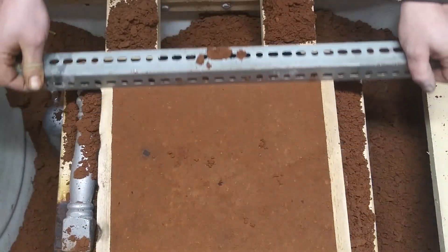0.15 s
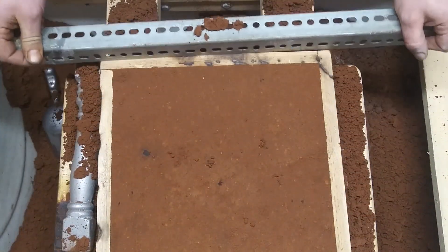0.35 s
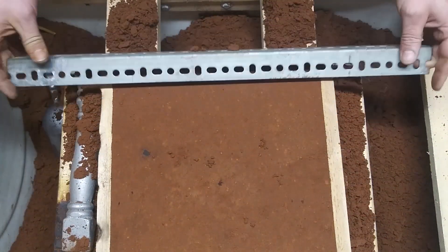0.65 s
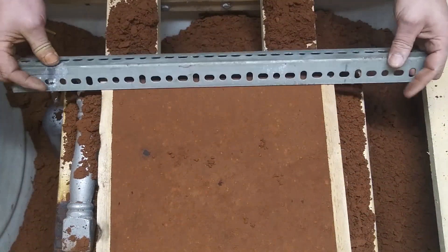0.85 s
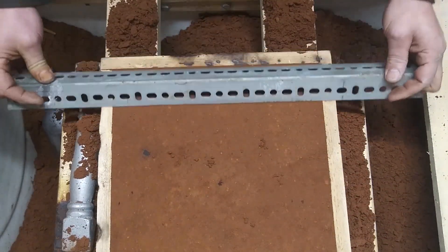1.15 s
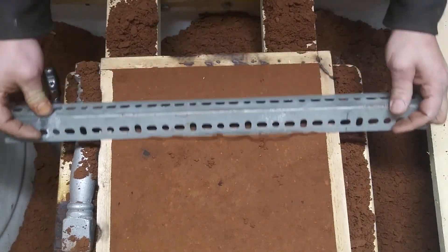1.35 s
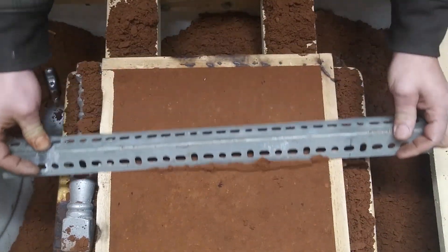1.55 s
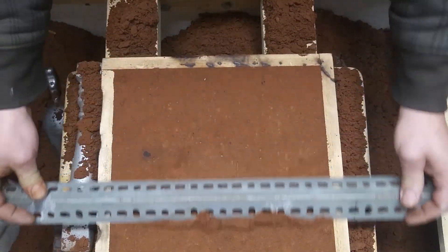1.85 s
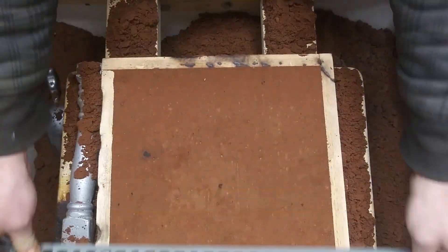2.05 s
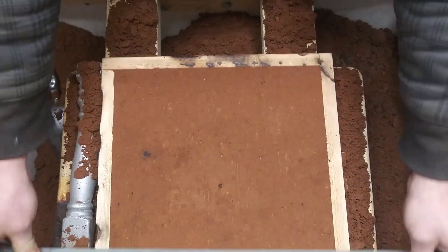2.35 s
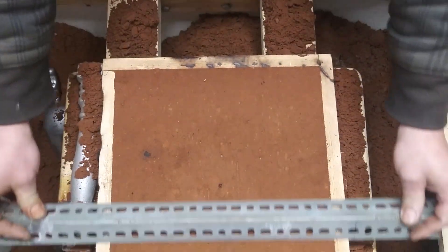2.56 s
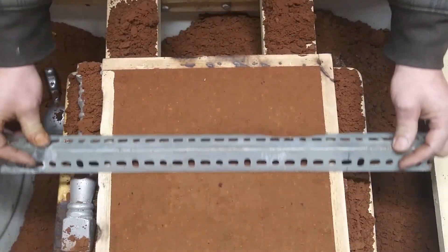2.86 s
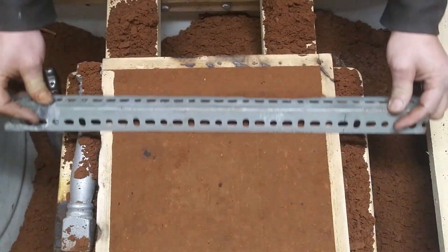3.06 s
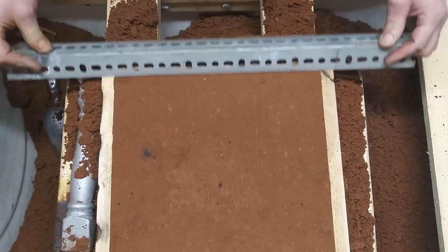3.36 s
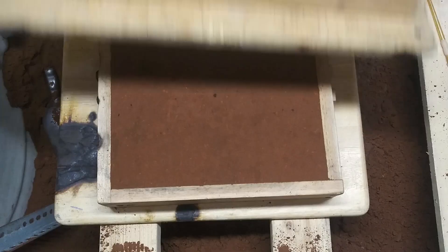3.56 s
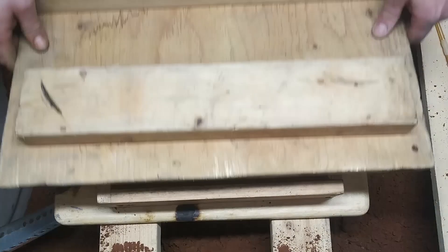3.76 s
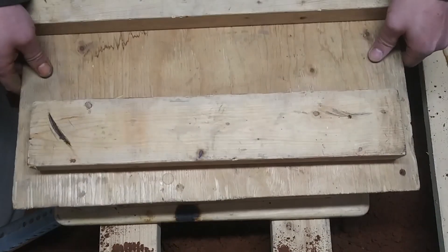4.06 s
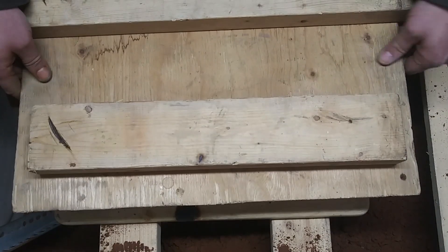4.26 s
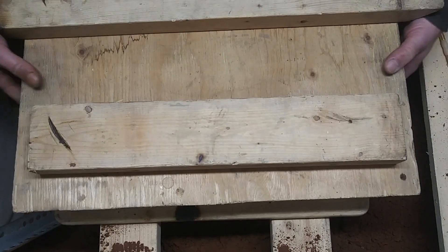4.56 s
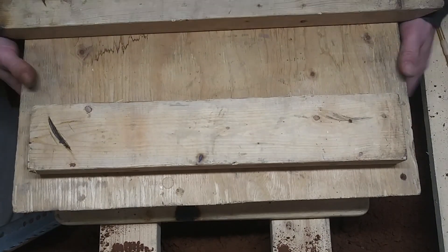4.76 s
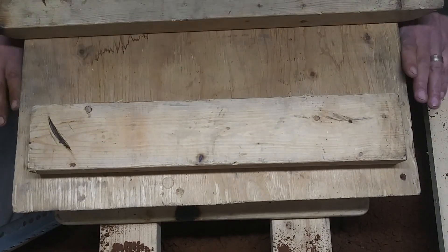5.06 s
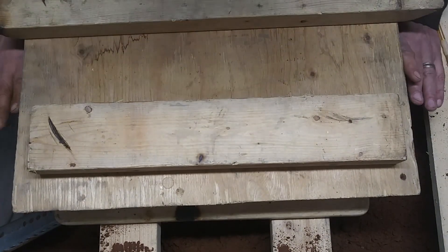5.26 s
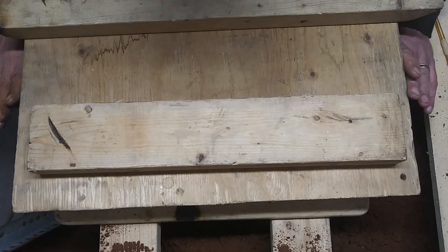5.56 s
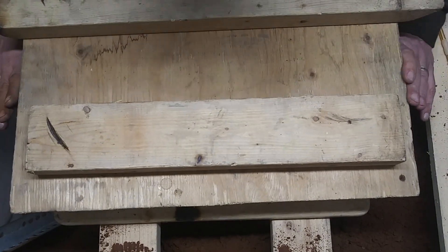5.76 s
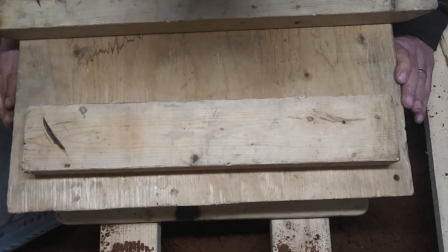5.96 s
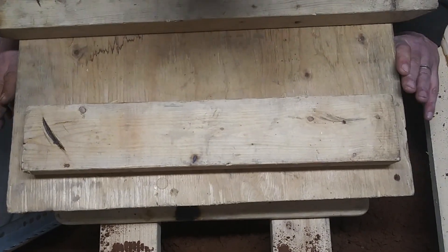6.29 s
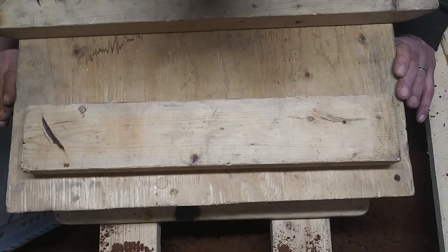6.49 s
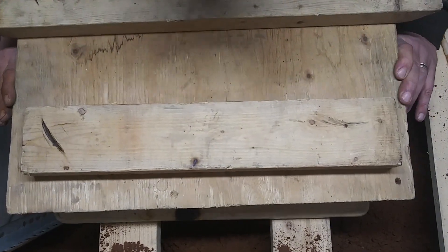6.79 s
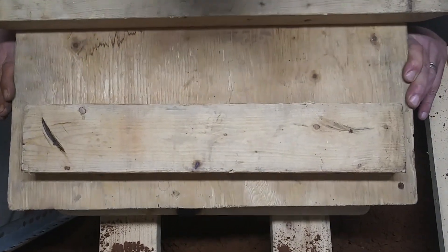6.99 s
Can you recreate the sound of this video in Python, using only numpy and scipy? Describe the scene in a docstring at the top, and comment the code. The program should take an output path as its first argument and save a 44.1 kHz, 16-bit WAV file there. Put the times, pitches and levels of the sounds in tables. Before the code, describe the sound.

A steel bar scrapes hissing across damp sand in three strokes, knocking a wooden frame, then a plywood board drops with a clattering thud and is nudged.

```python
"""A steel bar hisses, sings and grinds over damp sand in three strokes and knocks on a wooden frame;
then a plywood board drops with a rattle and is rubbed and nudged into its bed, in a small quiet workshop.
The perforated angle bar shaves the sand level: random grain clicks drive its modes and shake the frame.
Blows are decaying modes and noise bursts; pushes of the board are swells of grain noise.
Diffuse wall echoes and a steady air noise lie behind."""
import sys
import numpy as np
from scipy import signal
from scipy.fft import rfft
from scipy.io import wavfile

SR = 44100
rng = np.random.default_rng(int(sys.argv[2]) if len(sys.argv) > 2 else 0)


def inscribe(sig):
    """Save sig as 16-bit PCM at rate SR to the path in sys.argv[1].

    A 1-D sig is mono; a 2-D sig holds one channel per row.
    Samples are clipped to [-1, 1] before scaling.
    """
    pcm = np.round(np.clip(np.atleast_2d(sig).T, -1, 1) * 32767)
    wavfile.write(sys.argv[1], SR, pcm.astype(np.int16))


N = 314433
TIME = np.arange(N) / SR
RING_TIME = TIME[:SR // 2]
HEAP_FLANGE_DB = -14.5  # muffling by a full heap of sand

# steel bar modes: f/Hz, relative level scraped/dB, relative level struck/dB, t60 struck/s
BAR_MODES = [(1190, -28, -13, 0.14), (1620, -21, -12, 0.16), (2444, -12.5, -6, 0.096),
             (3585, 2, -11.5, 0.1), (4070, -7, -31, 0.015), (4750, -0.5, -13, 0.064),
             (5674, -2.5, -8.5, 0.044), (6240, -5, -15, 0.065), (7180, -27, -10.5, .11),
             (7530, -30, -14, 0.12), (8010, -4, -31, 0.078), (8380, -22, -24, .12), (9300, -18, -24, 0.12),
             (9010, 1.5, -26, 0.083), (9600, 1, -14, 0.17), (10150, -2, -21, .12)]
# sand-filled frame modes: f/Hz, relative level/dB, t60/s
FRAME_MODES = [(122.2, -12.5, 0.23), (205, -2, 0.083), (247, -5, 0.076), (310, 0.5, 0.038),
               (380, -7.5, 0.031), (583, -15, 0.09), (728, -23, 0.062), (1345, -27, 0.04)]
# plywood board modes: f/Hz, relative level/dB, t60 off the sand/s
BOARD_MODES = [(111.3, -15.5, 0.73), (138.5, -13, .25), (210.6, -2, 0.13), (288.7, -8, 0.042),
               (384, 1.5, 0.083), (456.4, -10, 0.21), (498, -13, 0.15), (613, -3.5, .1), (652, -17.5, .11),
               (708, -11.5, 0.17), (816, 2.5, 0.078), (885, -7.5, .08), (992, -10, 0.067),
               (1076, -16, 0.075), (1950, -18.5, .09), (3070, -11, .08)]
# spectrum of sand hiss under the bar: f/Hz, relative level per Hz/dB
BAR_HISS_SPECTRUM = [(2000, -17), (3200, -16.5), (5600, -15), (6600, -5), (7300, -4.5), (8000, 3.5),
                     (8600, 3), (9400, -1), (10300, -4), (11900, -8), (14000, -7.5), (15800, -23)]
# spectrum of the rumble of rubbing: f/Hz, relative level per Hz/dB
RUMBLE_SPECTRUM = [(30, -33), (70, -23.5), (105, -6), (155, -9), (225, 5.5), (290, -4), (400, -12.5),
                   (600, -25.5), (1500, -62)]
# spectrum of dense wood modes: f/Hz, relative level per Hz/dB
WOOD_SPECTRUM = [(40, -29), (80, -10), (130, -6.5), (250, -4), (450, 1.5), (900, 1.5), (1250, -5.5),
                 (1600, -9), (2000, -14), (3000, -23), (5000, -38), (12000, -48.5)]
# spectrum of crushed grit: f/Hz, relative level per Hz/dB
GRIT_SPECTRUM = [(200, 2), (1000, 1), (2700, -3.5), (4200, -5), (6500, -15), (8400, 2), (10500, -9.5),
                 (15500, -23.5)]


def bar_scrape():
    """Grains hiss under the edge, ring the steel and shake the frame."""
    # bar brushing the sand in passing: t/s, half length/s, hiss level/dB, edge rasp level/dB
    brushes = [(0.45, .05, -62.5, -83), (0.53, .015, -57, -84), (0.635, 0.031, -43, -75),
               (0.818, .02, -45, -59), (0.94, 0.09, -68, -71), (2.244, 0.014, -37, -43.5)]
    # bare edge rasp spectrum: f/Hz, relative level per Hz/dB
    edge_spectrum = [(300, -6), (2000, -13), (2550, 6), (3200, -4), (4400, 3), (5500, -12), (9000, -16)]
    # frame rasp spectrum: f/Hz, relative level per Hz/dB
    rasp_spectrum = [(280, 1), (480, 0.5), (720, 0.5), (950, -1), (1350, 1.5), (1900, -6), (2700, -26),
                     (5000, -2), (9000, -31)]
    flange_hz = 2445  # strong low resonance of the bar, damped by the sand
    hiss_gain, steel_gain, flange_gain, rasp_gain, rumble_gain = bar_levels()
    brush_gain, edge_gain = swells(brushes)
    fine = grains(per_s=14000, size_db=3.0, judder_db=2.0, judder_rate_hz=130)
    coarse = grains(per_s=3000, size_db=-0.5, judder_db=1.83, judder_rate_hz=70)

    muffled_db = HEAP_FLANGE_DB * heap_size()
    steel = 0
    for hz, scraped_db, _, t60_s in BAR_MODES:
        # the higher a mode, the less the heap muffles it
        mode_gain = from_db(scraped_db + muffled_db * (flange_hz / hz) ** 1.58)
        steel = steel + mode_gain * rubbed_mode(coarse, hz, 0.77 * t60_s)

    hiss = colour(dense_modes(fine, t60_s=0.046, share_db=-2.5), BAR_HISS_SPECTRUM)
    edge = colour(coarse, edge_spectrum)
    flange = rubbed_mode(coarse, flange_hz, t60_s=0.029, swell_db=-5.5)
    frame = through_body(dense_modes(coarse, t60_s=0.083, share_db=-7.5), FRAME_MODES,
                         lift_db=-6.5, widen=0.77)
    lumps = from_db(1.9 * drift(rate_hz=35))  # lumps in the sand make the rasp uneven
    rasp = lumps * colour(frame, rasp_spectrum)
    rumble = colour(coarse, RUMBLE_SPECTRUM)
    return ((hiss_gain + brush_gain) * hiss + edge_gain * edge + steel_gain * steel
            + flange_gain * flange + rasp_gain * rasp + rumble_gain * rumble)


def bar_levels():
    """Drag and the heap of sand set hiss, ring, flange, rasp and rumble, each by its own law."""
    # drag in each stroke (away, back, away): t/s, sand hiss level/dB
    strokes = [
        [(0.0, -34.5), (0.012, -31.5), (0.168, -32.5), (0.366, -35), (0.42, -70)],
        [(1.02, -58.5), (1.06, -50.5), (1.068, -44), (1.122, -45), (1.266, -34), (1.474, -44.5), (1.544, -41.5),
         (1.762, -41.5), (1.996, -28), (2.082, -29.5), (2.17, -63.5)],
        [(2.33, -53), (2.342, -43.5), (2.404, -26.5), (2.488, -31.5), (2.56, -28), (2.708, -31.5), (2.736, -37),
         (3.114, -36), (3.238, -32.5), (3.284, -26), (3.434, -42), (3.454, -69), (3.5, -67)],
    ]
    # how freely the grip lets the steel ring: t/s, level/dB
    grip = [(0.05, -1), (0.3, -6), (1.2, 0.5), (1.8, 3), (2.06, 6.5), (2.4, 5), (2.65, 5), (2.8, 2.5),
            (3.3, -1.5)]
    usual_drag_db = -33.5
    drag = sum(stroke_drag(rows) for rows in strokes)
    heap = heap_size()
    grip_gain = from_db(np.interp(TIME, *np.transpose(grip)))

    def follow(usual_db, db_per_drag_db, full_heap_db):
        """Gain of a layer: a power of the drag, offset by the heap."""
        return from_db(usual_db + full_heap_db * heap) * (drag / from_db(usual_drag_db)) ** db_per_drag_db

    steel = grip_gain * follow(-49.5, 1.06, 0)
    flange = follow(-44.5, 0.83, HEAP_FLANGE_DB)
    rasp = follow(-52, 1.04, 7)  # a full heap grinds harder
    rumble = follow(-52, 0.97, 1)
    return drag, steel, flange, rasp, rumble


def stroke_drag(rows, fade_s=0.02):
    """Drag of one stroke as a gain; it dies quickly outside the stroke."""
    s, db = np.transpose(rows)
    outside_s = np.maximum(np.maximum(s[0] - TIME, TIME - s[-1]), 0)
    return from_db(np.interp(TIME, s, db)) * np.exp(-np.minimum(outside_s / fade_s, 20))


def heap_size():
    """Size of the heap of sand ahead of the edge, 0-1."""
    # t/s, size/0-1
    heap_rows = [(0.3, 0.83), (1.1, 0.37), (1.6, 0.2), (1.9, 0.54), (2.05, 0.73), (2.4, 1), (2.6, 0.6),
                 (2.76, 0.1), (3.27, 0.29), (3.42, 0.52)]
    return np.interp(TIME, *np.transpose(heap_rows))


def bar_knocks():
    """Each touch rings the bar, thumps the frame and clatters; the bar hums on as it leaves the frame."""
    # bar meets frame: t/s, steel ring level/dB, frame thud level/dB, clatter level/dB, clash level/dB
    knock_rows = [(0.6594, -26.5, -25.5, -32, -20), (.731, -44, -25.5, -37.5, -39),
                  (0.7443, -36, -26, -38, -32.5), (.756, -31, -23.5, -29.5, -51),
                  (.767, -32.5, -31.5, -37.5, -54), (.785, -60, -30.5, -40, -47),
                  (1.066, -45, -43, -53, -51), (1.173, -52, -24, -44, -50), (2.091, -42, -33.5, -52, -39),
                  (2.3125, -25.5, -45, -21, -32.5), (2.318, -45, -25, -22, -45),
                  (2.333, -49, -22, -33, -51), (2.394, -53, -23.5, -29.5, -43),
                  (2.452, -57, -26.5, -38, -42), (2.699, -49, -55, -60, -36), (3.016, -60, -42, -67, -42)]
    # clatter spectrum: f/Hz, relative level per Hz/dB
    clatter_spectrum = [(80, 2), (150, -13), (260, 6), (450, 1.5), (720, 2.5), (950, -6), (1350, 2),
                        (2000, -7), (3000, -9.5), (5500, -15.5), (8500, -33), (15000, -27)]
    # hum of the lifted bar: f/Hz, level/dB, t60/s
    lift_modes = [(109, -43, .4), (920, -42.5, .14)]
    out = np.zeros(N)
    for s, steel_db, thud_db, clatter_db, clash_db in knock_rows:
        luck_db = rng.normal(0, 2.0, len(BAR_MODES))  # each blow excites the modes differently
        struck_modes = [(hz, db + own_db, t60_s)
                        for (hz, _, db, t60_s), own_db in zip(BAR_MODES, luck_db)]
        steel = ring(struck_modes, rise_s=0.0017)
        thud = ring(FRAME_MODES, rise_s=0.0039)
        clatter = burst(clatter_spectrum, t60_s=0.067, rise_s=0.00058)
        clash = burst(BAR_HISS_SPECTRUM, t60_s=0.07, rise_s=0.0022, focus=(8200, 0.35))
        add(out, s, from_db([steel_db, thud_db, clatter_db, clash_db]) @ [steel, thud, clatter, clash])
    add(out, 2.09, ring(lift_modes, rise_s=0.0033))
    return out


def board_blows():
    """The board rings and pushes the frame down until the sand damps both; grit cracks; hands bump it."""
    # board lands on one edge, then falls flat: t/s, ring level/dB, strongest f/Hz, spread/octaves,
    # delay until damped/s, frame thud level/dB, dense ring level/dB, grit level/dB
    landings = [(3.8196, -10, 650, .8, 0.092, -17.5, -19.5, -25),
                (3.9851, -6.5, 280, 0.68, 0.041, -33.5, -17.5, -30)]
    # hands press and bump the board: t/s, level/dB, strongest f/Hz, spread/octaves
    bumps = [(4.96, -38.5, 112, .25), (5.113, -32, 105, 0.24), (5.255, -43, 470, .3),
             (6.268, -40.5, 1100, 1.3), (7.027, -35, 215, 0.22)]
    sand_t60_s, crunch_db = 0.07, -41.5
    out = np.zeros(N)
    for s, ring_db, centre_hz, octaves, free_s, thud_db, dense_db, grit_db in landings:
        board = from_db(ring_db) * board_ring(centre_hz, octaves)
        thud = from_db(thud_db) * ring(FRAME_MODES, rise_s=0.0037)
        damping = from_db(-60 * np.maximum(RING_TIME - free_s, 0) / sand_t60_s)
        dense = from_db(dense_db) * burst(WOOD_SPECTRUM, t60_s=0.071, rise_s=0.0011)
        grit = from_db(grit_db) * burst(GRIT_SPECTRUM, t60_s=0.023, rise_s=0.0004)
        add(out, s, (board - thud) * damping + dense + grit)
        # grit crushed as the sand catches the board
        add(out, s + free_s, from_db(crunch_db) * burst(GRIT_SPECTRUM, t60_s=0.03, rise_s=0.001))
    for s, db, centre_hz, octaves in bumps:
        add(out, s, from_db(db) * board_ring(centre_hz, octaves))
    return out


def board_ring(centre_hz, octaves):
    """Where the board is struck decides which of its modes speak."""
    free_share = 0.71  # share of the free ring time
    modes = [(hz, db + bell_db(hz, centre_hz, octaves), free_share * t60_s) for hz, db, t60_s in BOARD_MODES]
    return ring(modes, rise_s=0.0035)


def board_rattle(count=4):
    """The edge chatters on the gritty frame, ever faster and weaker, before the board falls flat."""
    s, gap_s, gap_shrink, loss_db = 3.833, 0.038, 0.66, 5
    out = np.zeros(N)
    for k in range(count):
        wood = from_db(-30.5) * burst(WOOD_SPECTRUM, t60_s=0.08, rise_s=0.0011)
        grit = from_db(-34) * burst(GRIT_SPECTRUM, t60_s=0.05, rise_s=0.00036)
        add(out, s, from_db(-k * loss_db) * (wood + grit))
        s += gap_s * gap_shrink ** k
    return out


def board_slide():
    """Grains roll over the sand bed with each push of the board."""
    # pushes: t/s, half length/s, then relative levels of hiss/dB, rasp/dB, rumble/dB
    pushes = [(4.235, 0.074, -48.5, -48, -50), (4.289, 0.017, -37, -89, -82), (4.42, 0.17, -58, -64, -94),
              (4.492, 0.0063, -58, -53.5, -57), (4.635, 0.075, -46.5, -52.5, -58),
              (4.84, 0.057, -38.5, -46.5, -55), (4.916, 0.019, -38, -38, -76),
              (5.051, .012, -51, -55.5, -66), (5.143, 0.05, -58, -59, -58), (5.271, 0.022, -45, -48, -58),
              (5.335, 0.01, -53, -50.5, -58), (5.404, 0.055, -60, -66.5, -61),
              (5.67, 0.15, -62.5, -63, -68), (5.805, .04, -48, -47, -52), (5.86, 0.051, -50, -49.5, -50.5),
              (6.05, .04, -64.5, -65, -78), (6.2, 0.03, -64.5, -68, -85), (6.278, 0.0081, -47, -42, -53),
              (6.9, 0.13, -69, -67.5, -61.5), (7.0, 0.024, -56.5, -69, -48), (7.12, 0.079, -48.5, -49, -47)]
    # board hiss spectrum: f/Hz, relative level per Hz/dB
    hiss_spectrum = [(3000, -16.5), (6500, -13.5), (7500, -4.5), (8500, 2), (9300, 0), (10500, -9),
                     (13000, -11.5), (15800, -23)]
    # board rasp spectrum: f/Hz, relative level per Hz/dB
    rasp_spectrum = [(200, -29), (400, -6), (520, -1), (700, -6), (1100, -6), (1500, -8), (2100, -6.5),
                     (2600, -10), (3300, -6.5), (4300, -11), (6500, -16.5), (10000, -36)]
    hiss_gain, rasp_gain, rumble_gain = swells(pushes)
    fine = grains(per_s=7200, size_db=2.0, judder_db=2.5, judder_rate_hz=66)
    coarse = grains(per_s=3000, size_db=-0.5, judder_db=2.0, judder_rate_hz=71)
    board = through_body(dense_modes(coarse, t60_s=0.067, share_db=-13.5), BOARD_MODES,
                         lift_db=-1, widen=1.26)
    return (from_db(-0.84) * hiss_gain * colour(fine, hiss_spectrum)
            + rasp_gain * colour(board, rasp_spectrum)
            + from_db(-1.5) * rumble_gain * colour(coarse, RUMBLE_SPECTRUM))


def taps():
    """Small dry contacts on the sandy wood: focused grit bursts."""
    # t/s, level/dB, favoured f/Hz, spread/octaves, t60/s
    tap_rows = [(3.59, -40.5, 1307, 2.8, 0.14), (5.041, -53, 3000, 1.3, 0.062),
                (5.33, -40.5, 870, 0.53, 0.041), (5.518, -16.5, 2600, 1.06, 0.024),
                (6.268, -43.5, 1100, 2.4, 0.053), (6.986, -48, 400, 1.4, 0.1)]
    out = np.zeros(N)
    for s, db, centre_hz, octaves, t60_s in tap_rows:
        touch = burst(GRIT_SPECTRUM, t60_s, rise_s=0.056 * t60_s, focus=(centre_hz, octaves))
        add(out, s, from_db(db) * touch)
    return out


def workshop(x, build_s=0.0053):
    """Diffuse wall echoes as decaying noise in eight bands; the highest treble dies first."""
    # workshop reverberation: f/Hz, t60/s
    room_t60 = [(125, 0.29), (500, 0.17), (2000, 0.2), (8000, 0.15), (16000, 0.09)]
    tail = 0
    edges_hz = np.geomspace(60, 16000, 9)
    for low_hz, high_hz in zip(edges_hz, edges_hz[1:]):
        sos = signal.butter(2, [low_hz, high_hz], "band", fs=SR, output="sos")
        band = signal.sosfilt(sos, rng.standard_normal(len(RING_TIME)))
        t60_s = at_hz(room_t60, np.sqrt(low_hz * high_hz))
        tail = tail + band * decay(t60_s, build_s)
    return convolve_unit(x, tail)


def workshop_air():
    """Steady noise of the quiet room."""
    # f/Hz, relative level per Hz/dB
    air_spectrum = [(15, -61.5), (25, -22.5), (55, -2), (130, -0.5), (220, -4), (316, -5), (572, -8),
                    (857, -10.5), (1510, -14.5), (5520, -21), (6200, -24), (8400, -11.5), (11000, -18.5),
                    (15800, -20)]
    return from_db(-64.5) * colour(rng.standard_normal(N), air_spectrum)


def grains(per_s, size_db, judder_db, judder_rate_hz):
    """Sand grains slipping: random clicks of uneven size, bunched by stick and slip."""
    sizes = from_db(size_db * np.minimum(rng.exponential(1, N), 4)) * rng.choice([-1, 1], N)
    slips = rng.random(N) < per_s / SR
    return sizes * slips * from_db(judder_db * drift(judder_rate_hz))


def rubbed_mode(force, hz, t60_s, waver=0.0024, swell_db=0.5):
    """One mode under a travelling contact, which bends its pitch a little and feeds it unevenly."""
    bent_hz = hz * (1 + waver * drift(rate_hz=21.0))
    turn = np.exp(2j * np.pi * np.cumsum(bent_hz) / SR)
    loss = from_db(-60 / (t60_s * SR))  # gain per sample
    # resonate at 0 Hz in the turning frame, then turn back up
    mode = (turn * signal.lfilter([1], [1, -loss], force * turn.conj())).real
    return rms_one(mode) * from_db(swell_db * drift(rate_hz=6.09))


def dense_modes(x, t60_s, share_db):
    """A crowd of weak, close resonances gives a rubbed body its fine, fixed colour."""
    tail = rng.standard_normal(len(RING_TIME)) * decay(t60_s, rise_s=0.0005)
    return x + from_db(share_db) * convolve_unit(x, tail)


def through_body(x, modes, lift_db, widen):
    """Rubbing stands out at the body's own modes, their widths scaled by the pressure of the contact."""
    peaks = 0
    for hz, _, t60_s in modes:
        width_hz = widen * np.log(1000) / (np.pi * t60_s)
        peaks = peaks + signal.lfilter(*signal.iirpeak(hz, hz / width_hz, fs=SR), x)
    return x + from_db(lift_db) * peaks


def swells(rows):
    """Short rubs (t/s, half length/s, levels/dB) as one gain curve for each level column."""
    gains = 0
    for s, half_s, *levels_db in rows:
        # exponent 1 is a pointed swell, 2 a rounded one
        shape = np.exp(-np.minimum(np.abs((TIME - s) / half_s) ** 1.56, 20))
        gains = gains + from_db(levels_db)[:, None] * shape
    return gains


def ring(modes, rise_s):
    """Struck modes (f/Hz, level/dB, t60/s), neighbours in opposite sign."""
    out = 0
    for k, (hz, db, t60_s) in enumerate(modes):
        tone = np.sin(2 * np.pi * hz * RING_TIME) * decay(t60_s, rise_s)
        out = out + (-1) ** k * from_db(db) * tone
    return out


def burst(spectrum, t60_s, rise_s, focus=None):
    """A crowd of modes too dense to tell apart, dying together."""
    return colour(rng.standard_normal(len(RING_TIME)), spectrum, focus) * decay(t60_s, rise_s)


def decay(t60_s, rise_s):
    """Envelope of a blow: builds during the contact, then dies away."""
    return from_db(-60 * RING_TIME / t60_s) * (1 - np.exp(-RING_TIME / rise_s))


def colour(x, spectrum, focus=None):
    """Shape x by a spectrum, closed at the low end, and optionally a (f/Hz, octaves) focus; rms 1."""
    hz = np.fft.rfftfreq(len(x), 1 / SR)
    db = at_hz(spectrum, hz)
    if focus:
        db = db + bell_db(hz, *focus)
    low_end = np.minimum(hz / spectrum[0][0], 1) ** 2
    return rms_one(np.fft.irfft(rfft(x) * from_db(db) * low_end, len(x)))


def bell_db(hz, centre_hz, octaves):
    """A blow favours the pitches around its centre; 3 dB down at the given distance in octaves."""
    distance = np.log2(np.maximum(hz, 1) / centre_hz) / octaves
    return -10 * np.log10(1 + distance ** 4)


def at_hz(points, hz):
    """Read a table on a log-frequency axis."""
    f, value = np.transpose(points)
    return np.interp(np.log(np.maximum(hz, 1)), np.log(f), value)


def drift(rate_hz):
    """Slow chance: straight lines between normal random knots, rate_hz knots a second."""
    knots = rng.standard_normal(N // 20)
    return np.interp(TIME * rate_hz, np.arange(len(knots)), knots)


def convolve_unit(x, tail):
    """Convolve with a tail scaled to unit energy."""
    return signal.fftconvolve(x, tail / np.sqrt(np.sum(tail ** 2)))[:N]


def add(track, s, sound):
    """Mix a sound into a track at a time in seconds."""
    start = int(s * SR)
    track[start:start + len(sound)] += sound[:N - start]


def rms_one(x):
    """Scale to rms 1."""
    return x / np.sqrt(np.mean(x ** 2) + 1e-20)


def from_db(db):
    """Decibels to gain."""
    return 10 ** (np.asarray(db) / 20)


def scene():
    """Direct sounds, their echoes and the air, alike in both channels."""
    rubbing = bar_scrape() + board_slide()
    knocks = bar_knocks() + board_blows() + board_rattle()
    ticks = taps()
    room = workshop(from_db(-14.0) * rubbing + from_db(-9) * knocks + from_db(-13) * ticks)
    return np.tile(rubbing + knocks + ticks + room + workshop_air(), (2, 1))


def record(dry):
    """The microphone loses the deep bass; the top is cut steeply."""
    mic_low_hz, cutoff_hz = 65, 15850
    thin = signal.sosfilt(signal.butter(2, mic_low_hz, "high", fs=SR, output="sos"), dry)
    return signal.sosfilt(signal.ellip(12, 0.1, 80, cutoff_hz, fs=SR, output="sos"), thin)


dry = scene()
out = record(dry)
inscribe(out)
```